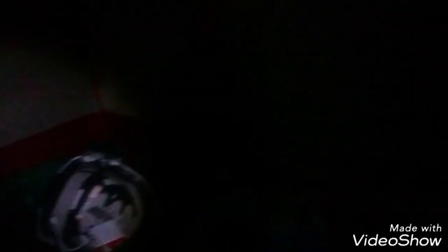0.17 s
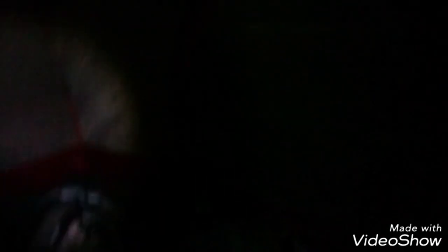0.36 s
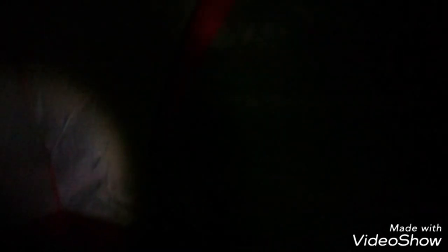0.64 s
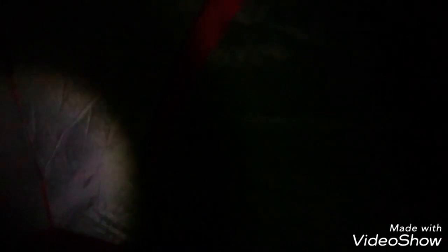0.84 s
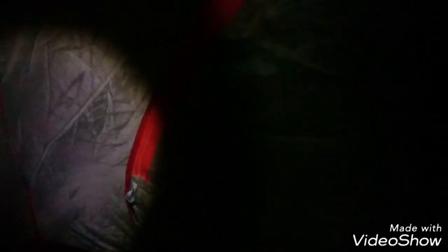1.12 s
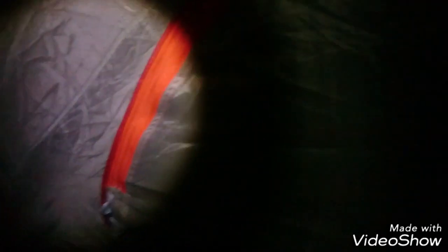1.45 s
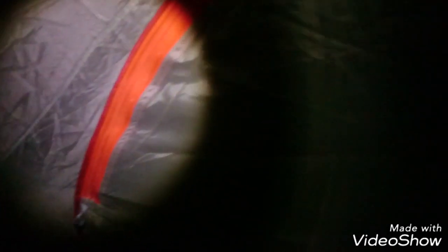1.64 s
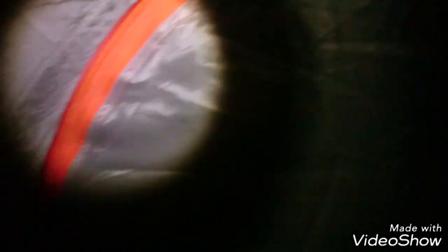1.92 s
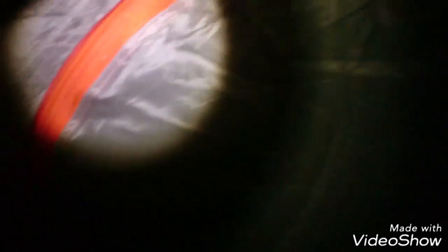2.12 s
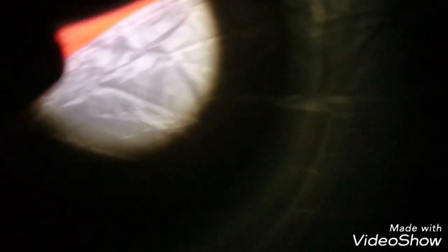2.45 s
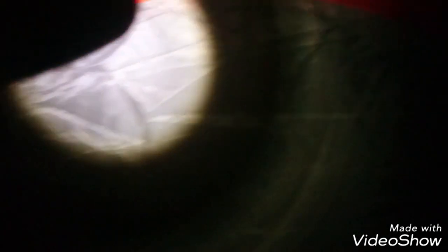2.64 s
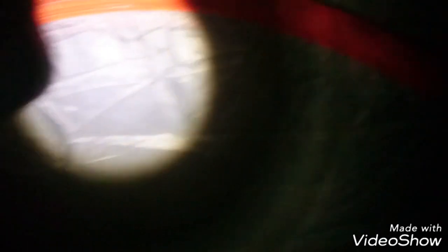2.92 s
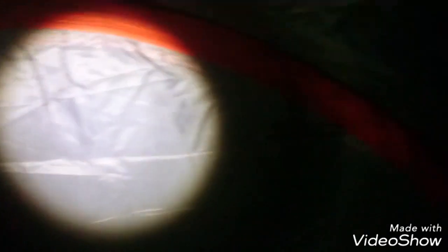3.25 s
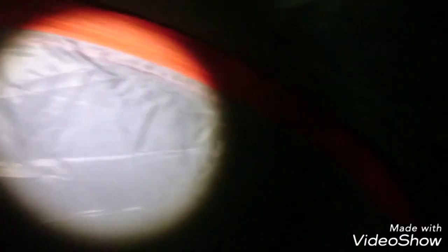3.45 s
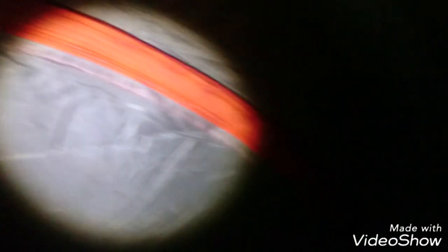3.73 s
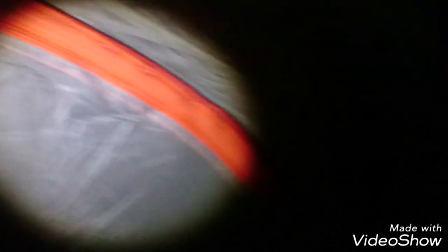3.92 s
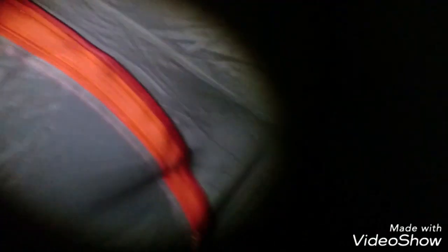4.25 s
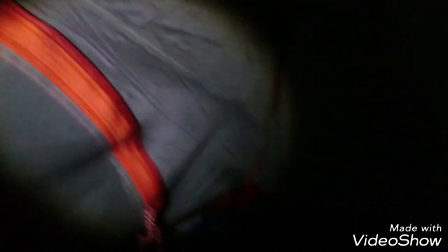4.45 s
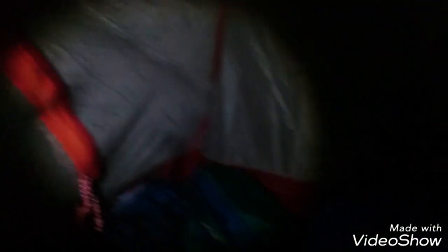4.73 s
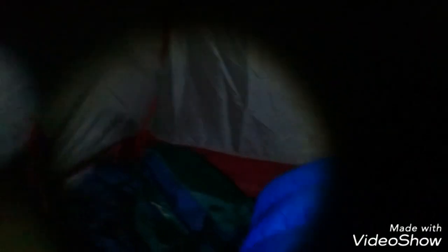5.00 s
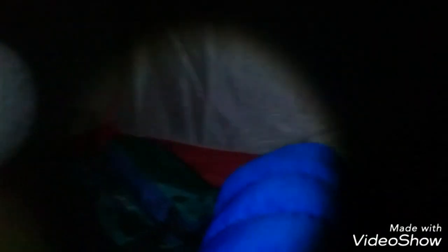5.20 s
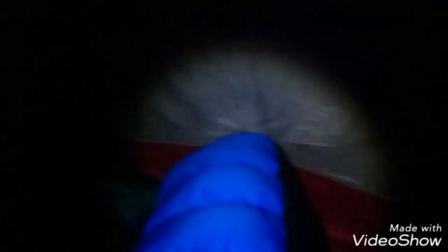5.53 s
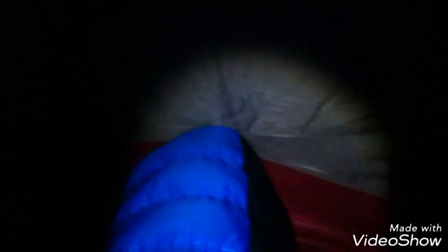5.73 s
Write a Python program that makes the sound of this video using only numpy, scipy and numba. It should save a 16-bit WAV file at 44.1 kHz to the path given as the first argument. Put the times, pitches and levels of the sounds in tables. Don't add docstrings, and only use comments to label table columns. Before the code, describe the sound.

Inside a small tent, hundreds of raindrops a second tap the tight fabric on all sides, blending into a crackling patter over faint hiss. Irregular fat drops snap close by with bright, papery ticks, and slack patches give small dull thuds. The rain eases slightly, then thickens in the last two seconds. A hand-held phone captures it, thin in bass, brighter and fuller on the right.

```python
import sys
import numpy as np
from scipy import signal
from scipy.fft import rfft, irfft
from scipy.io import wavfile
from scipy.ndimage import uniform_filter1d
from numba import njit

SR = 44100
rng = np.random.default_rng(int(sys.argv[2]) if len(sys.argv) > 2 else 0)


def store_wav(level_fs):
    pcm = np.round(np.clip(np.atleast_2d(level_fs), -1, 1) * 32767)
    wavfile.write(sys.argv[1], SR, pcm.T.astype(np.int16))


def attenuation_scalar(level_db):
    decades = np.asarray(level_db, float) / 20
    return 10 ** decades


N = 258867

# time_s, level_db
SHOWER = [(0.0, -33.5), (0.47, -34), (0.72, -35.5), (2.43, -36.5), (2.6, -36.5), (2.99, -36.5),
          (3.64, -34.5), (4.27, -29.5), (4.54, -30.5), (5.57, -28), (5.87, -28.5)]
# start_s, peak_db, note_hz, splash_db
FAT_DROPS = [(0.233, -20, 4100, -27), (0.295, -14, 4330, -31), (0.414, -10, 3720, -37),
             (0.439, -13, 2760, -23.5), (0.7985, -16.5, 3620, -29.5), (0.91, -14, 2300, -29),
             (1.055, -14, 3860, -30), (1.095, -13, 3940, -30), (1.189, -6.5, 4180, -30),
             (1.373, -12.5, 3550, -42), (1.4395, -20, 3230, -43), (1.5232, -17, 3440, -45),
             (1.6134, -17, 3290, -34), (1.7703, -10, 3920, -28.5), (2.1012, -18, 4050, -26),
             (2.4582, -12, 3750, -32), (2.674, -9, 4500, -30), (2.783, -16, 3470, -35),
             (3.0316, -12, 3700, -26.5), (3.159, -13.5, 4000, -35), (3.4, -8.5, 3570, -27.5),
             (3.4962, -10.5, 3900, -35), (3.5647, -11, 4260, -25), (3.6603, -24, 3000, -28),
             (3.7616, -7.5, 4400, -21.5), (4.053, -16, 3000, -24.5), (4.14, -7, 4010, -25),
             (4.5314, -9, 3400, -21), (5.1666, -16, 3900, -37), (5.549, -11, 3730, -35)]
# start_s, peak_db
SLACK_THUDS = [(0.0375, -17.5), (0.1018, -18.5), (0.414, -20), (0.439, -14.5), (0.9, -19), (0.91, -19),
               (1.7153, -18.5), (1.7702, -16), (2.188, -22.5), (3.159, -24.5), (3.2244, -21), (3.4963, -19),
               (3.804, -22), (4.14, -22), (4.317, -19), (4.5316, -21)]
# centre_s, rain_level_change_db
FLURRIES = [(0.11, -0.5), (0.24, -0.5), (0.499, 0), (0.6, 3.5), (0.95, 0.5), (1.12, 3.5), (1.279, 0.5),
            (1.63, -1), (2.2, 0), (2.36, -2), (2.5, 1), (2.731, 1), (3.0, 0), (3.24, -1.5), (3.6, -1),
            (3.8, 1), (4.25, -1.5), (4.751, 0.5), (5.45, -0.5)]
# freq_hz, gain_db
LEFT_PORT = [(60, -30.5), (200, -28.5), (450, -22.5), (900, -20.5), (1500, -23), (3000, -25), (4900, -19.5),
             (5400, -24), (7000, -14), (8800, -14), (10300, -23.5), (11800, -64), (14500, -118),
             (15700, -110)]
# freq_hz, gain_db
RIGHT_PORT = [(60, -30.5), (200, -22), (450, -14.5), (750, -7), (1300, -4), (2200, 2), (3100, 0),
              (4100, 3.5), (5700, -11.5), (8000, -15.5), (9000, -22), (10600, -14.5), (12000, -21),
              (15000, -22)]
# start_s, end_s, bass_edge_hz
LEFT_THIN = [(0.0, 0.055, 385), (0.173, 0.195, 60), (0.287, 0.4, 307), (0.56, 0.613, 180),
             (0.65, 1.106, 293), (1.25, 1.72, 365), (1.79, 2.05, 408), (2.1, 2.354, 300), (2.4, 2.47, 420),
             (2.567, 2.656, 620), (2.72, 2.98, 454), (3.076, 3.587, 252), (3.65, 3.72, 178),
             (3.84, 3.99, 60), (4.096, 4.62, 140), (4.733, 4.95, 141), (5.003, 5.04, 180),
             (5.087, 5.152, 220), (5.303, 5.34, 383), (5.65, 5.733, 60), (5.77, 5.81, 140)]
# start_s, end_s, bass_edge_hz
RIGHT_THIN = [(0.0, 0.062, 400), (0.144, 0.194, 560), (0.26, 0.33, 510), (0.678, 0.887, 418),
              (0.936, 1.03, 330), (1.07, 1.1, 570), (1.23, 1.4, 450), (1.495, 1.637, 552),
              (1.71, 1.727, 660), (1.86, 2.027, 560), (2.21, 2.33, 390), (2.4, 2.465, 527),
              (2.563, 2.636, 440), (2.677, 2.684, 460), (2.707, 3.004, 450), (3.096, 3.376, 410),
              (3.417, 3.54, 415), (3.65, 3.73, 452), (3.907, 3.96, 516)]
# left_hz, right_hz
THIN_TOP_HZ = (11300, 12000)
# always_db, thin_spell_db
FLOOR_DB = ((-22.0, -7.5), (-16.5, -11.5))

STRIKE = 1.8
PORT_LAG_S = 0.00022
TENT_T60_S, TENT_DB = 0.06, -16.0
DROPS_PER_S, TAP_S = 900, 0.0007
SIZE_SPREAD_DB, LARGEST_DB, SIDE_SPREAD_DB = 1.5, 11.0, 1
PATTER_BUNCH_DB, PATTER_BUNCH_HZ = 1.4, 30
FAT_TAP_S = 0.0013
NEAR_PER_S, NEAR_LOW_HZ, NEAR_HIGH_HZ = 44, 1800, 4500
NEAR_DB, NEAR_SPREAD_DB, NEAR_TOP_DB = -27, 2.5, -23.5
NEAR_PER_DB = 0.6
SPLASH_DB, THUD_DB, COLOUR_SPREAD_DB = -16.5, -18, 11
FLURRY_S, FLURRY_DROPS, FLURRY_NEAR_DB = 0.035, 6, 2
MEAN_SHOWER_DB, FAR_DB, FAR_PER_DB = -36, 0.92, 0.1541
HISS_FLICKER_DB = 0.3
TREBLE_DB, TREBLE_FLICKER_DB = 2, 0.77


@njit
def ring_fabric(start, lag, hz, width_hz, tap_s, left, right, noise, tail, tail_fade, strike):
    out = np.zeros((2, len(noise)))
    wave = np.zeros(int(-4 / np.log(tail_fade)))
    for d in range(len(start)):
        pole = np.exp((2j * np.pi * hz[d] - np.pi * width_hz[d]) / SR)
        drive = np.sqrt(1 - abs(pole) ** 2)
        fade = np.exp(-1 / (tap_s[d] * SR))
        z = strike + 0j
        burst, rustle = 1., tail
        for i in range(len(wave)):
            z = z * pole + drive * (burst + rustle) * noise[(7919 * d + i) % len(noise)]
            burst *= fade
            rustle *= tail_fade
            wave[i] = z.real
        peak = np.abs(wave).max()
        a, b = start[d] + lag[d], start[d]
        for i in range(min(len(wave), len(noise) - max(a, b))):
            out[0, a + i] += left[d] * wave[i] / peak
            out[1, b + i] += right[d] * wave[i] / peak
    return out


def fall(s, hz, width_hz, tap_s, left_db, right_db, place):
    start = np.clip((s * SR).astype(np.int64), 64, N - 64)
    lag = (place * PORT_LAG_S * SR).astype(np.int64)
    each = np.ones(len(s))
    tail_fade = np.exp(-np.log(1000) / (TENT_T60_S * SR))
    return ring_fabric(start, lag, hz * each, width_hz * each, tap_s * each, attenuation_scalar(left_db) * each,
                       attenuation_scalar(right_db) * each, rng.standard_normal(N), float(attenuation_scalar(TENT_DB)), tail_fade, STRIKE)


def patter():
    u = rng.random((int(DROPS_PER_S * N / SR), 6)).T
    size_db = np.minimum(-SIZE_SPREAD_DB * np.log(1 - u[1]), LARGEST_DB)
    side = 2 * u[2] - 1
    hz = 200 + 13000 * u[3] ** 1.343
    width_hz = 900 + 3000 * u[4]
    tap_s = TAP_S * (0.76 + 2.5 * u[5])
    side_db = SIDE_SPREAD_DB * side
    drops = fall(u[0] * N / SR, hz, width_hz, tap_s, size_db + side_db, size_db - side_db, 1.3 * side)
    return drops / np.sqrt(np.mean(drops ** 2))


def draw_near_drops():
    bunched_s = np.repeat(np.transpose(FLURRIES)[0], FLURRY_DROPS)
    bunched = len(bunched_s)
    u = rng.random((bunched + int(NEAR_PER_S * N / SR), 5)).T
    s = u[0] * N / SR
    s[:bunched] = bunched_s + FLURRY_S * (2 * u[0, :bunched] - 1)
    db = np.minimum(NEAR_DB - NEAR_SPREAD_DB * np.log(1 - u[1]), NEAR_TOP_DB)
    db[:bunched] += FLURRY_NEAR_DB
    db += NEAR_PER_DB * (np.interp(s, *np.transpose(SHOWER)) - MEAN_SHOWER_DB)
    hz = NEAR_LOW_HZ + (NEAR_HIGH_HZ - NEAR_LOW_HZ) * np.sqrt(u[2])
    splash_db = db + SPLASH_DB + COLOUR_SPREAD_DB * (2 * u[3] - 1)
    thud_db = db + THUD_DB + COLOUR_SPREAD_DB * (2 * u[4] - 1)
    fat = np.transpose(FAT_DROPS)
    fat = np.vstack([fat, fat[1] + THUD_DB - 6.5])
    return np.hstack([fat, [s, db, hz, splash_db, thud_db]])


def near_drops():
    s, db, hz, splash_db, thud_db = draw_near_drops()
    place = rng.uniform(-1.2, 1, len(s))
    note_db = db - port_db(RIGHT_PORT, hz) + 0.36
    note = fall(s, hz, 1150, FAT_TAP_S, note_db - 7.0, note_db - 1.0, place)
    smack = fall(s, 3800, 7400, 0.11 * FAT_TAP_S, db - 7.0, db - 6.0, place)
    splash = fall(s, 9000, 6400, 0.54 * FAT_TAP_S, splash_db + 18.5, splash_db + 20.5, place)
    slack_s, slack_db = np.transpose(SLACK_THUDS)
    s = np.append(s, slack_s)
    thud_db = np.append(thud_db, slack_db - 3.0)
    place = np.append(place, np.full(len(slack_s), -0.4))
    thud = fall(s, 1020, 570, 0.78 * FAT_TAP_S, thud_db + 9.0, thud_db + 6.0, place)
    return note + smack + splash + thud


def walk(rate_hz):
    k = int(SR / rate_hz)
    held = np.repeat(rng.standard_normal(N // k + 1), k)
    return 1.3 * uniform_filter1d(uniform_filter1d(held, k), k)[:N]


def far_rain():
    both, left, right = rng.standard_normal((3, N))
    own = np.array([left, right])
    alike = 0.66
    low = signal.butter(2, 1300, "low", fs=SR, output="sos")
    bass = signal.sosfiltfilt(low, alike * both + (np.sqrt(1 - alike ** 2) - 1) * own)
    return (own + bass) * attenuation_scalar(HISS_FLICKER_DB * walk(10))


def scene():
    t = np.arange(N) / SR
    db = np.interp(t, *np.transpose(SHOWER))
    far_db = FAR_DB + FAR_PER_DB * (db - MEAN_SHOWER_DB)
    swell_db = sum(lift_db * np.exp(-((t - s) / (1.4 * FLURRY_S)) ** 2) for s, lift_db in FLURRIES)
    bunched = patter() * attenuation_scalar(PATTER_BUNCH_DB * walk(PATTER_BUNCH_HZ))
    rain = (bunched + far_rain() * attenuation_scalar(far_db)) * attenuation_scalar(db + swell_db + 4)
    treble = signal.sosfilt(signal.butter(2, 6000, "high", fs=SR, output="sos"), rain)
    treble_gain = attenuation_scalar(TREBLE_DB + TREBLE_FLICKER_DB * walk(6.7))
    return rain + (treble_gain - 1) * treble + near_drops()


def port_db(response, hz):
    port_hz, gain_db = np.transpose(response)
    return np.interp(np.log(np.maximum(hz, 1)), np.log(port_hz), gain_db)


def port(x, response, turn_rad):
    cep = irfft(np.log(attenuation_scalar(port_db(response, np.linspace(0, SR / 2, 1025)))))
    cep[1:1024] *= 2
    cep[1025:] = 0
    coloured = signal.fftconvolve(x, irfft(np.exp(rfft(cep))))[:N]
    return irfft(rfft(coloured) * np.exp(1j * turn_rad), N)


def thin_out(x, spells, top_hz, floor_db):
    offset = 316
    hz, s, z = signal.stft(np.pad(x, (offset, 0)), SR, "cosine", nperseg=2048, noverlap=1024)
    hz = hz[:, None]
    s = s - offset / SR
    power = abs(z) ** 2
    share = power / uniform_filter1d(power.mean(axis=0), size=3)
    bands = uniform_filter1d(share, size=12, axis=0)
    lines = uniform_filter1d(share, size=3, axis=0)
    always, in_spell = attenuation_scalar(floor_db) ** 2
    z[(lines < always) & (hz > 700)] = 0
    ragged = 2 ** (0.2 + 0.35 * rng.standard_normal(len(s)))
    for start_s, end_s, bass_hz in spells:
        now = (s > start_s) & (s < end_s)
        z[:, now] *= (hz > bass_hz * ragged[now]) & (hz < top_hz) & (bands[:, now] > in_spell)
    return signal.istft(z, SR, "cosine", nperseg=2048, noverlap=1024)[1][offset:N + offset]


def low_pass(x):
    return signal.sosfilt(signal.butter(12, 15730, fs=SR, output="sos"), x)


def record(dry):
    x = np.array([port(dry[0], LEFT_PORT, 3.0), port(dry[1], RIGHT_PORT, 0)])
    x = np.tanh(1.85 * x) / 1.251
    x = signal.sosfilt(signal.butter(1, 20, "high", fs=SR, output="sos"), x)
    x = signal.sosfilt(signal.butter(7, 15100, fs=SR, output="sos"), x)
    settings = zip(x, (LEFT_THIN, RIGHT_THIN), THIN_TOP_HZ, FLOOR_DB)
    mix = np.array([thin_out(*each) for each in settings])
    return low_pass(mix)


dry = scene()
out = record(dry)
store_wav(out)
```